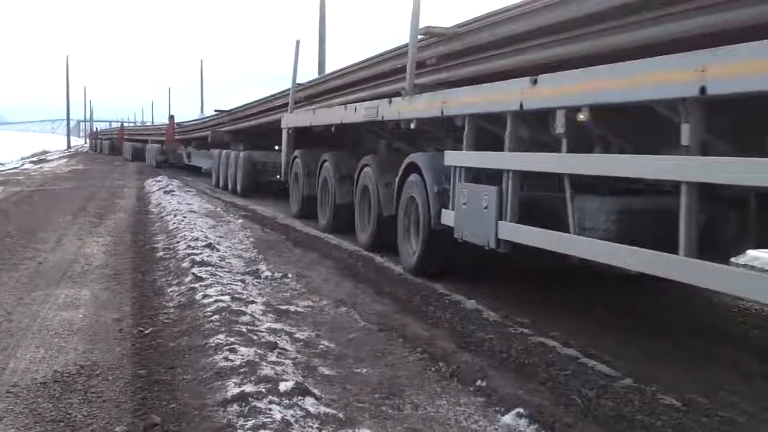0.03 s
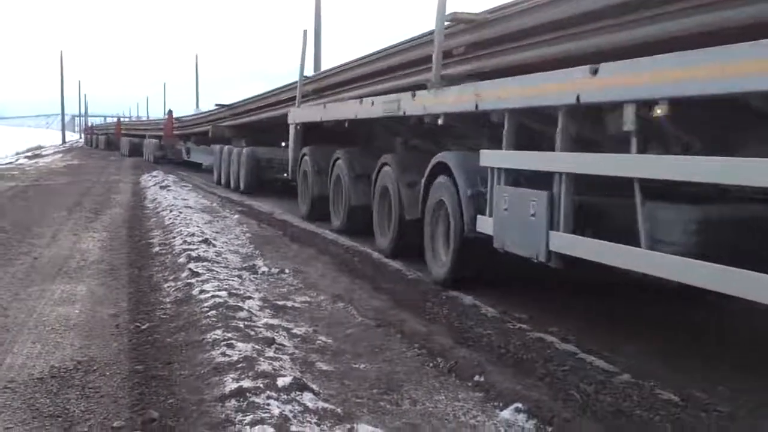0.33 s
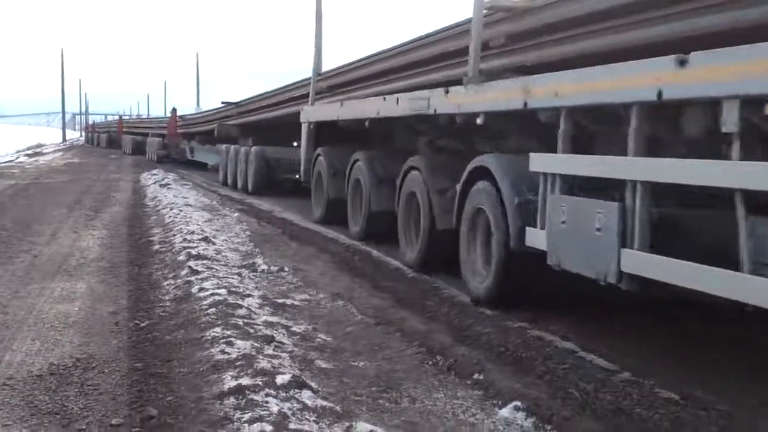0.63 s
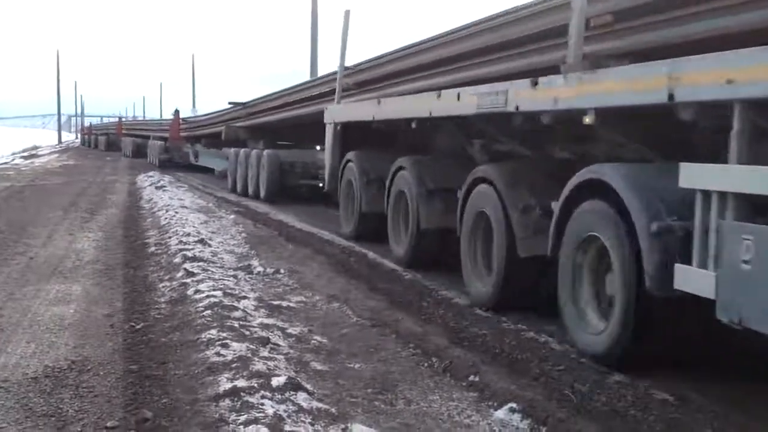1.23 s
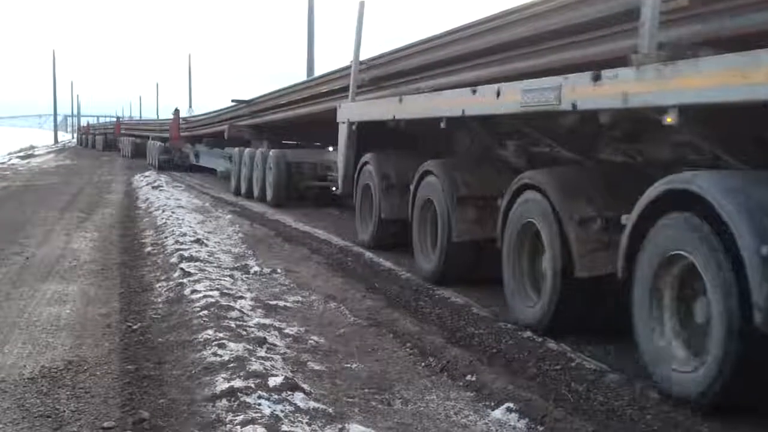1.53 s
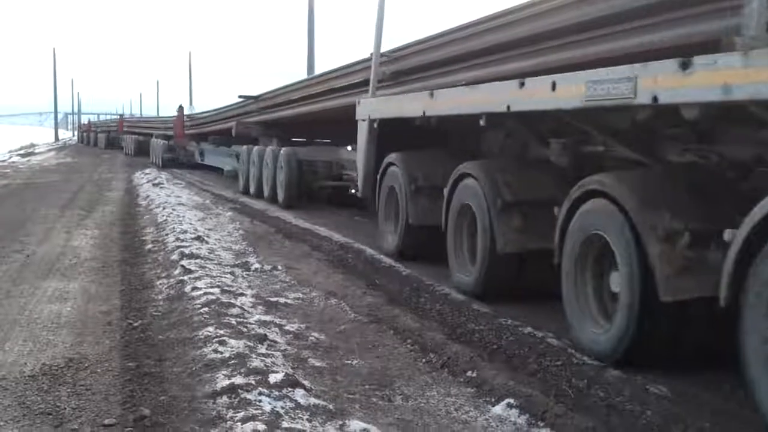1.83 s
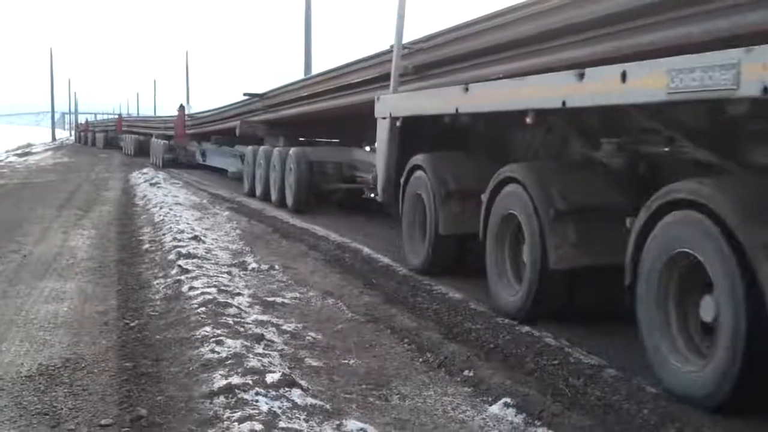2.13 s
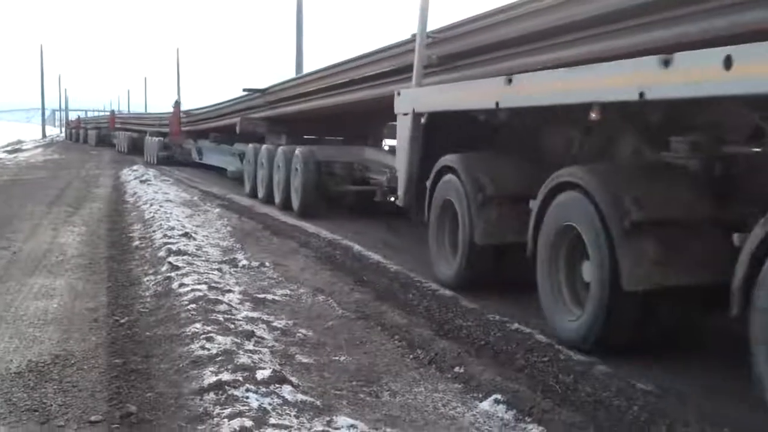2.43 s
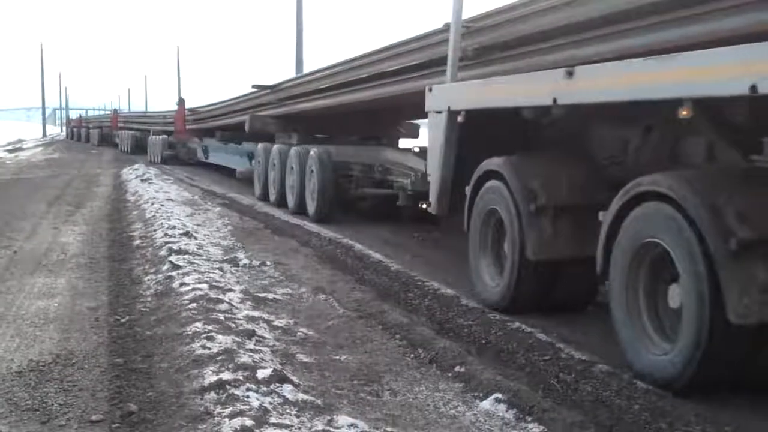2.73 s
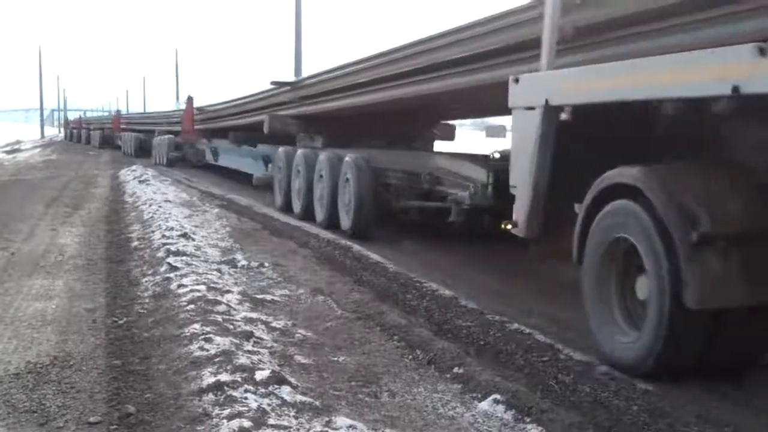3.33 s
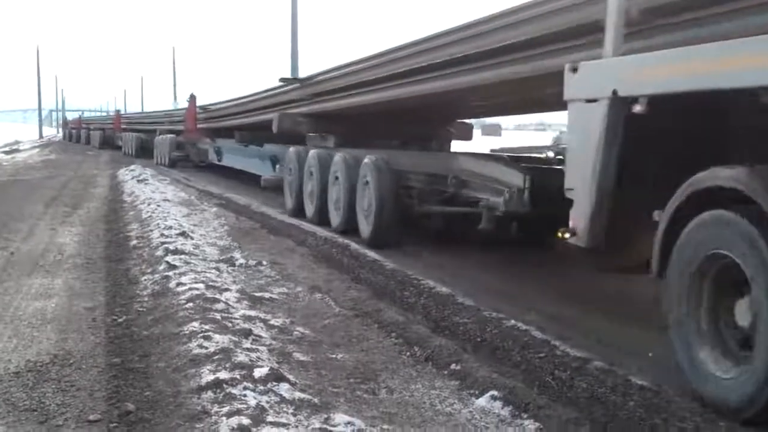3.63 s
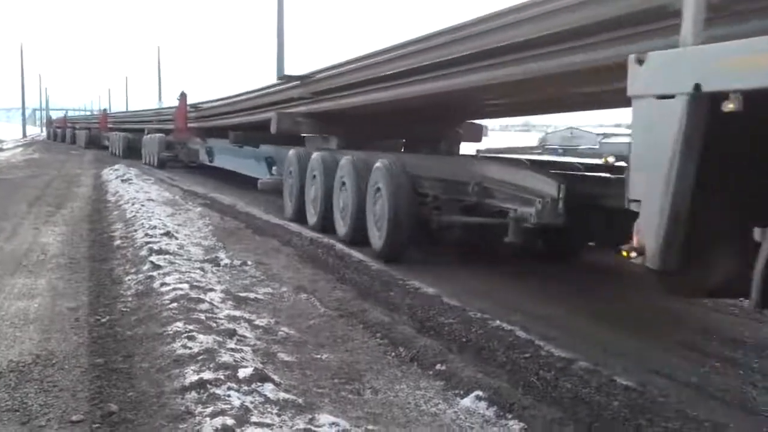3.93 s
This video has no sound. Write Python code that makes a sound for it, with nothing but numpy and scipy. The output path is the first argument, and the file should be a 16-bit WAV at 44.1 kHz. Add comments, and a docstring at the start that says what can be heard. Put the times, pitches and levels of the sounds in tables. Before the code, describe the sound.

Steel rails clank and thump irregularly on a slowly passing trailer, loudest midway, with light rattling and rubbing. Tyres rumble and hiss increasingly over wet grit, while wind gusts hit the roadside microphone on the left.

```python
"""Wind buffets the left microphone port over the hiss and rumble of tyres on a wet, gritty road.
A long trailer loaded with steel rails rolls slowly past, the hiss growing as its axles draw level.
The load knocks on its bed: the bed thumps, rattles and rings, the rails clash, rub and squeak.
The strongest gusts and heaviest thumps overload the recorder."""
import sys
import numpy as np
from scipy import signal
from scipy.fft import rfft, irfft
from scipy.io import wavfile
from scipy.ndimage import uniform_filter1d, minimum_filter1d

SR = 44100
rng = np.random.default_rng(int(sys.argv[2]) if len(sys.argv) > 2 else 0)


def store_wav(level_fs):
    """Save 16-bit WAV to argv[1]."""
    pcm = np.round(np.clip(np.atleast_2d(level_fs), -1, 1) * 32767)
    wavfile.write(sys.argv[1], SR, pcm.T.astype(np.int16))


N = 176400
T = np.arange(N) / SR

# the load knocks on its bed:
# t/s, thump level/dB, clash level/dB, thump t60/s, sharp share of the clash/0-1, ring f/Hz, ring level/dB
LOAD_KNOCKS = [(0.140, -12, -25, 0.4, 0.2, 459, -22), (0.205, -12.5, -19, 0.55, .4, 358, -11.5),
               (0.356, -14.5, -19, 0.39, 0.22, 366, -11), (0.593, 3, -3, 0.2577, 0, 588, -2),
               (0.730, -11.5, -12.5, 0.37, 0.09, 387, -11), (0.856, -9.5, -16.5, 0.28, 0.44, 360.2, -6.5),
               (1.081, -8.5, -10, .4, 0.03, 275, -5.5), (1.132, -11.5, -16.5, 0.29, 0.03, 333, -8.5),
               (1.182, -3, -4, 0.3075, 0.2, 460, -7.5), (1.228, -9.5, -16.5, 0.56, 0.07, 261, -5),
               (1.57, -3, 0, 0.31, 0.01, 532, -8), (1.625, -3, -2.5, 0.2625, 0.04, 563.6, -6.5),
               (1.899, -5.5, -10, 0.46, 0.35, 333, -8.5), (1.974, -4, -15, 0.5159, 0.22, 387, -8.5),
               (2.009, 1.5, 4.5, 0.2781, 0.61, 262, -1.5), (2.04, -3, -12, 0.19, 0, 460, -4),
               (2.087, 0, 0.5, 0.22, 0.23, 649, -4), (2.274, -6, -14, 0.2458, 0.07, 387, -11.5),
               (2.411, 1.5, 3.5, 0.34, 0.28, 540, -7), (2.432, -4.5, -15, 0.1968, 0.02, 451, -2),
               (2.737, -8.5, -15, 0.03, .1, 333, -17), (2.762, -11, -17.5, 0.19, .05, 261, -10),
               (2.866, -10, -22.5, 0.05, 0, 261, -7.5), (3.088, -9.5, -12.5, 0.324, 0.03, 334, -7.5),
               (3.21, -14, -30.5, 0.03, 0.11, 221, -15.5), (3.699, -3, -8.5, 0.31, 0.13, 285, -3),
               (3.943, -6, -14, .5, 0.02, 387, -7.5)]
# modes of the loaded bed: f/Hz, level/dB, t60/s
BED_MODES = [(149.37, -7.5, 0.18), (220.95, -7.5, 0.096), (261.25, -2.5, 0.09), (333, -3, 0.067),
             (387.7, -2, 0.0635), (460.4, -4, 0.0373), (535.5, -7.5, 0.0643), (597.8, -6.5, 0.067),
             (690.53, -6, 0.0434), (793.2, -9, 0.023), (1108, -13.5, 0.0253), (1536.5, -13.5, 0.062)]
THUMP_ATTACK_S, THUMP_HOLD_S = 0.00843, 0.00203


def from_db(db):
    """Decibels to gain."""
    return 10 ** (np.asarray(db) / 20)


def rms_one(x):
    """Scale to rms 1."""
    return x / np.sqrt(np.mean(x ** 2) + 1e-20)


def in_time(rows):
    """A curve through (t/s, value) points, at every sample."""
    return np.interp(T, *np.transpose(rows))


def pan(db):
    """Left and right gains, the left raised and the right lowered by db."""
    return from_db([[db], [-db]])


def colour(x, spectrum, column=1):
    """Give x the spectrum of a table; white noise keeps its power."""
    table, hz = np.array(spectrum), np.arange(N + 1) * SR / (2 * N)
    gain = from_db(np.interp(np.log(hz + 1e-3), np.log(table[:, 0]), table[:, column])) * (hz > 10)
    return irfft(rfft(x, 2 * N) * rms_one(gain))[..., :N]


def drift(rate_hz):
    """A smooth random wander of rms 1, mostly slower than rate_hz."""
    r = np.exp(-80 * np.pi * rate_hz / SR)
    slow = signal.lfilter([1], [1, -2 * r, r * r], rng.standard_normal(N // 40 + 2002))[2000:]
    return np.interp(np.arange(N) / 40, np.arange(len(slow)), rms_one(slow))


def resonate(x, modes):
    """Parallel resonances of a heavy body, each with its share of the power."""
    body_cut_hz = 3030   # heavy parts radiate little above this
    out, power = 0, 0
    for k, (hz, db, t60) in enumerate(modes):
        r = np.exp(-np.log(1000) / (t60 * SR))
        zeros = np.sqrt((1 - r * r) / 2) * np.array([1, 0, -1])
        poles = [1, -2 * r * np.cos(2 * np.pi * hz / SR), r * r]
        out = out + (-1) ** k * from_db(db) * signal.lfilter(zeros, poles, x + 1e-18)
        power += from_db(db) ** 2
    return signal.sosfilt(signal.butter(2, body_cut_hz, fs=SR, output="sos"), out) / np.sqrt(power)


def contacts(per_s, spread_db, channels=3):
    """Random clicks of uneven size, rms 1."""
    chance, size = rng.random((2, channels, N))
    hit, clicks = chance < per_s / SR, np.zeros((channels, N))
    draw = 2 * size[hit] - 1
    excess = np.minimum(-np.log(np.abs(draw) + 1e-9), 5)
    clicks[hit] = np.sign(draw) * from_db(spread_db * excess)
    return rms_one(clicks)


def blows(times, gains, t60s, attack_s=THUMP_ATTACK_S, hold_s=THUMP_HOLD_S):
    """Envelope of blows that swell quickly, hold briefly and die away."""
    power = np.zeros(N)
    for onset, gain, t60 in zip(times, gains, t60s):
        start = int(onset * SR)
        age = T[:min(N - start, SR // 2)]
        rise = np.minimum(age / attack_s, 1)
        fall = np.exp(-np.log(1000) * np.maximum(age - attack_s - hold_s, 0) / t60)
        power[start:start + len(age)] += (gain * rise * fall) ** 2
    return np.sqrt(power)


def at_microphone(paths, scatter):
    """The first of three paths arrives directly, left side first; two scatter off road and trailer."""
    # the load moves across the microphone: t/s, lead of the left side/ms
    left_lead = [(0, 0.00534), (1.4, 0.0535), (3.1, 0.227), (4, 0.275)]
    delayed = np.interp(T - in_time(left_lead) / 1000, T, paths[0])
    direct = np.array([paths[0], delayed])
    return (direct + scatter * paths[1:]) / np.sqrt(1 + scatter ** 2)


def wind():
    """Right at the microphone, eddies beat on the left port; the right one is sheltered."""
    # spectrum of the eddies: f/Hz, relative level/dB
    eddy_spectrum = [(12, -9), (25, -14), (45, -5.5), (70, -1.26), (110, -1.07), (170, -3), (250, -8.5),
                     (400, -15.5), (700, -25.5), (2000, -41.5), (8000, -87.5)]
    # strength of the gusts: t/s, level/dB
    gusts = [(0, -3), (.5, -6), (.8, -3.5), (1.3, -3), (1.9, -4), (2.3, -8), (2.7, -3.5), (3.3, -6.5),
             (4, -6)]
    sheltered_db = -24
    eddies = colour(rng.standard_normal((2, N)), eddy_spectrum)
    return eddies * from_db(in_time(gusts) + drift(12.3)) * from_db([[0], [sheltered_db]])


def tyres():
    """Down on the wet road, treads peel off the surface and crush grit, over a low rumble."""
    # spectrum of the hiss: f/Hz, relative level left/dB, relative level right/dB
    hiss_spectrum = [(300, -9, -12.5), (782.5, -1.5, -2), (1200, -2.45, -2.5), (1924, 3, -5), (2970, 5, -2),
                     (4750, -1.2317, -5), (6382.6, -1, -2), (7180, -7, 0.8), (8234, -10, -8),
                     (9494, -10, -11), (11910, -25.5, -21), (13200, -28, -37.5), (15500, -54, -54.5)]
    # hiss as the axles come near: t/s, level/dB
    approach = [(0, -19), (.3, -17.5), (.9, -15), (1.3, -14.5), (1.9, -12), (2.15, -13), (2.3, -11),
                (2.6, -11.5), (3.0, -12), (3.4, -12.5), (3.6, -13), (3.73, -12.5), (4, -12.5)]
    # spectrum of the rumble: f/Hz, relative level/dB
    rumble_spectrum = [(20, -24.5), (50, 1), (70, -7.5), (85, 3), (108, -8), (150, -0.5), (190, -7),
                       (300, -13), (600, -19), (1500, -48.5)]
    # strength of the rumble: t/s, level/dB
    rumble_level = [(0, -18.5), (1.4, -20), (2.1, -20), (2.3, -22), (2.6, -23), (3.2, -20.5), (3.35, -26),
                    (3.5, -21.5), (4, -24)]
    grit_db, flutter_db = -9, 0.5
    spray = rng.standard_normal((2, N))
    grit = from_db(grit_db) * contacts(per_s=1500, spread_db=4, channels=2)
    hiss = np.array([colour(spray[side] + grit[side], hiss_spectrum, side + 1) for side in range(2)])
    hiss *= pan(db=1.68) * from_db(in_time(approach) + flutter_db * drift(25.3))
    rumble = at_microphone(colour(rng.standard_normal((3, N)), rumble_spectrum), scatter=0.163)
    return hiss + from_db(in_time(rumble_level)) * rumble


def rubbing_steel():
    """Under the trailer, left of centre, uneven friction keeps a few steel resonances singing."""
    # modes of the rubbing steel: f/Hz, level/dB, t60/s
    steel_modes = [(947, -7.5, 0.0161), (1304, -5, 0.0285), (1399.4, -2.5, 0.0287), (1510.1, -1.5, 0.0249),
                   (1666, -5, 0.0147), (2550, -10.5, 0.026)]
    level_db, fade_db_per_s = -18.5, 0.18
    effort = from_db(level_db - fade_db_per_s * T + drift(4.4))
    singing = resonate(effort * contacts(per_s=1200, spread_db=2.5), steel_modes)
    return pan(db=4.5) * at_microphone(singing, scatter=1.46)


def squeaks():
    """Left of centre, a rail slipping on another sings one unsteady note that swells and fades."""
    # slips of the rails: t/s, length/s, f/Hz, level/dB
    slips = [(0.204, 0.075, 1510, -22), (0.308, 0.116, 1300, -21.5), (0.52, 0.0366, 1610, -18.5),
             (0.72, 0.0515, 1570, -20.5), (0.794, 0.06, 1410, -22), (1.134, 0.041, 1520, -17)]
    waver = 0.01207   # share of the pitch
    out = 0
    for onset, length, hz, db in slips:
        swell = np.sin(np.pi * np.clip((T - onset) / length, 0, 1))
        cycles = np.cumsum(hz * (1 + waver * drift(59))) / SR
        out = out + from_db(db) * swell * np.sqrt(2) * np.sin(2 * np.pi * cycles)
    return pan(db=4.5) * out


def hollow_ring():
    """Each knock sets the bed modes nearest the struck spot's pitch ringing as a firm, hollow tone."""
    spread_octaves, waver_rad, t60_share = 0.139, 0.805, 0.618
    times, _, _, t60, _, ring_hz, ring_db = np.transpose(LOAD_KNOCKS)
    octaves_off = np.log2(np.array(BED_MODES)[:, :1] / ring_hz)
    nearness = np.exp(-(octaves_off / spread_octaves) ** 2) + 1e-12
    shares = nearness / np.linalg.norm(nearness, axis=0)
    ring = 0
    for (hz, _, _), share in zip(BED_MODES, shares):
        phase = 2 * np.pi * (hz * T + rng.random((3, 1))) + waver_rad * drift(24.6)
        ring = ring + np.sin(phase) * blows(times, from_db(ring_db) * share, t60 * t60_share)
    return at_microphone(ring, scatter=0.213)


def clashing_rails():
    """Many rails touch within each knock; nearly half the clash reaches the microphone scattered."""
    # steel on steel: f/Hz, relative level/dB
    clash_spectrum = [(150, -18.5), (400, 0), (750, 2), (1050, -5.5), (1500, 1), (2100, -5), (3200, -10.5),
                      (5000, -14.5), (9000, -24.5), (15000, -49)]
    # a sharp steel edge striking: f/Hz, relative level/dB
    edge_spectrum = [(300, -19), (1200, -15.5), (2200, 2), (3000, 1), (4200, -7), (6000, -7.5), (9000, -15),
                     (15000, -30.5)]
    t60_share = 0.508
    times, _, clash_db, t60, sharp, _, _ = np.transpose(LOAD_KNOCKS)
    rails = 0
    for share, spectrum in ((1 - sharp, clash_spectrum), (sharp, edge_spectrum)):
        gains = from_db(clash_db) * np.sqrt(share)
        envelope = blows(times, gains, t60 * t60_share, attack_s=0.00271, hold_s=0.0112)
        rails = rails + envelope * colour(contacts(per_s=5000, spread_db=2.0), spectrum)
    return pan(db=1.98) * at_microphone(rails, scatter=0.89)


def thumping_bed():
    """Each knock is a dying flurry of contacts that booms in the bed, heard mostly by the direct path."""
    # light rattling of the bed between the knocks: t/s, level/dB
    rattle_level = [(0, -20.5), (.3, -20), (.5, -18), (.8, -17.5), (1.0, -20), (1.3, -20.5), (1.5, -27.5),
                    (2.1, -22), (2.22, -27), (2.6, -24.5), (3.0, -23.5), (3.35, -31.5), (3.55, -25),
                    (4, -25.5)]
    flutter_db = 2.5
    times, thump_db, _, t60, _, _, _ = np.transpose(LOAD_KNOCKS)
    thump = blows(times, from_db(thump_db), t60)
    rattle = from_db(in_time(rattle_level) + flutter_db * drift(9.8))
    force = np.hypot(thump, rattle) * contacts(per_s=5000, spread_db=1.5)
    return pan(db=1) * at_microphone(resonate(force, BED_MODES), scatter=0.217)


def scene():
    """The passing trailer as heard from the roadside, with wind on the microphone."""
    load = thumping_bed() + clashing_rails() + hollow_ring() + rubbing_steel() + squeaks()
    return load + tyres() + wind()


def record(dry):
    """A quick limiter eases the heaviest peaks, the input still clips softly, and the top rolls off."""
    limit_level, limit_s, clip_hardness = 1.617, 0.00335, 9.66
    rolloff_hz, cutoff_hz = 15080, 16500
    span = int(limit_s * SR)
    allowed_gain = 1 / np.maximum(np.abs(dry) / limit_level, 1)
    limited = dry * uniform_filter1d(minimum_filter1d(allowed_gain, span), span)
    clipped = limited / (1 + np.abs(limited) ** clip_hardness) ** (1 / clip_hardness)
    dulled = signal.sosfilt(signal.butter(3, rolloff_hz, fs=SR, output="sos"), clipped)
    return signal.sosfilt(signal.cheby2(12, 60, cutoff_hz, fs=SR, output="sos"), dulled)


dry = scene()
out = record(dry)
store_wav(out)
```